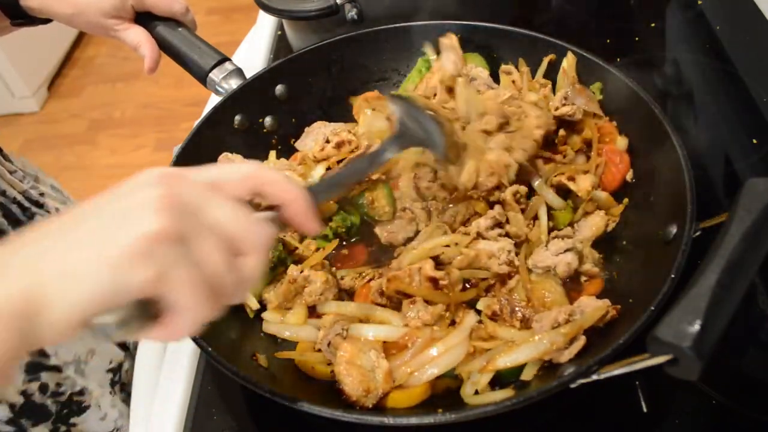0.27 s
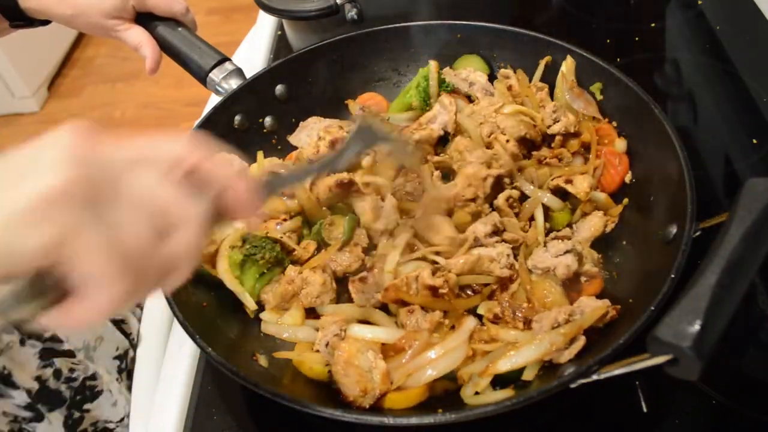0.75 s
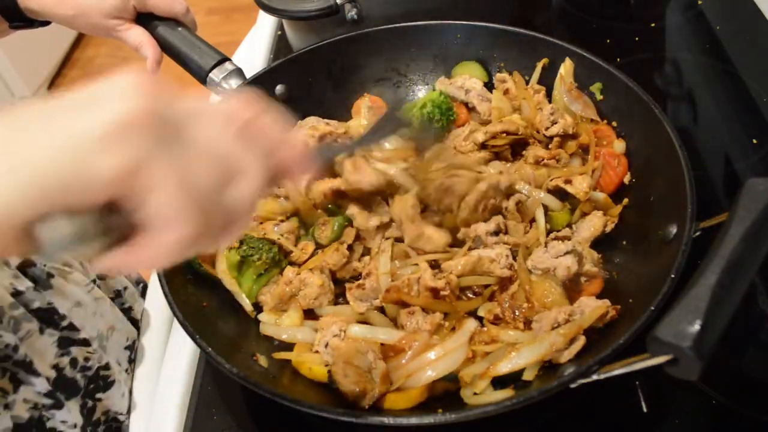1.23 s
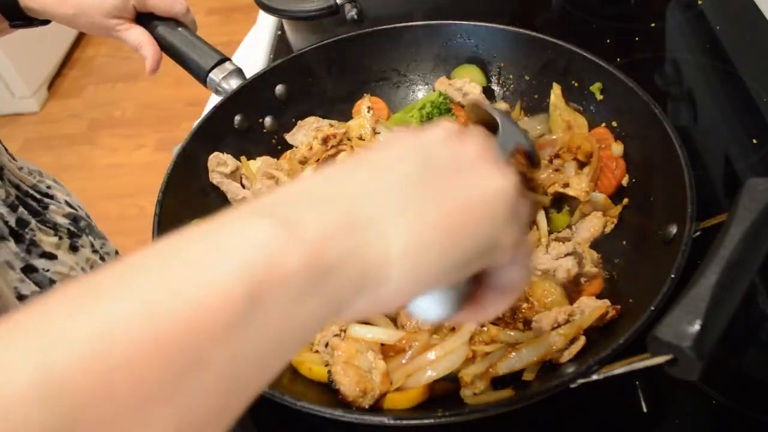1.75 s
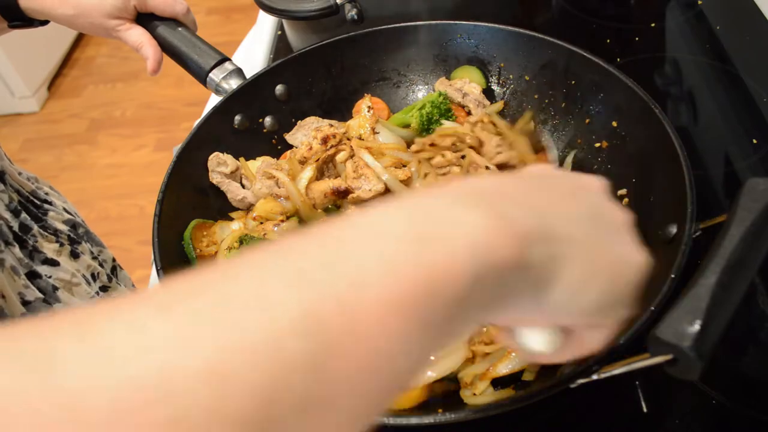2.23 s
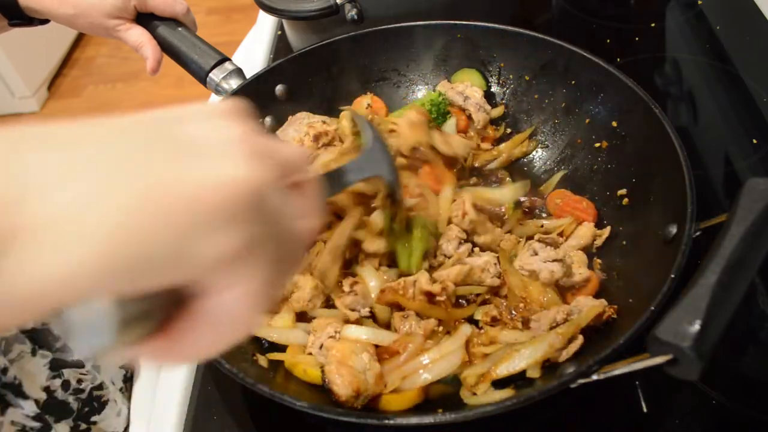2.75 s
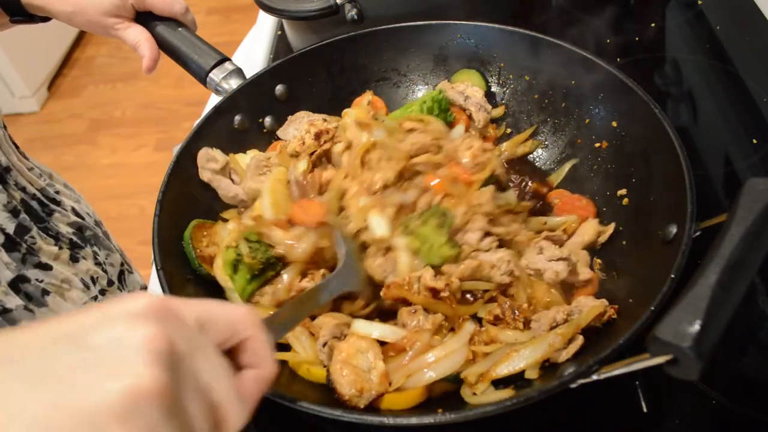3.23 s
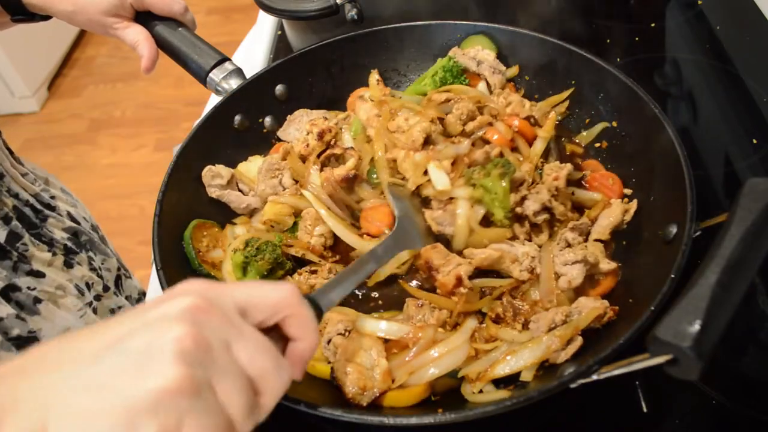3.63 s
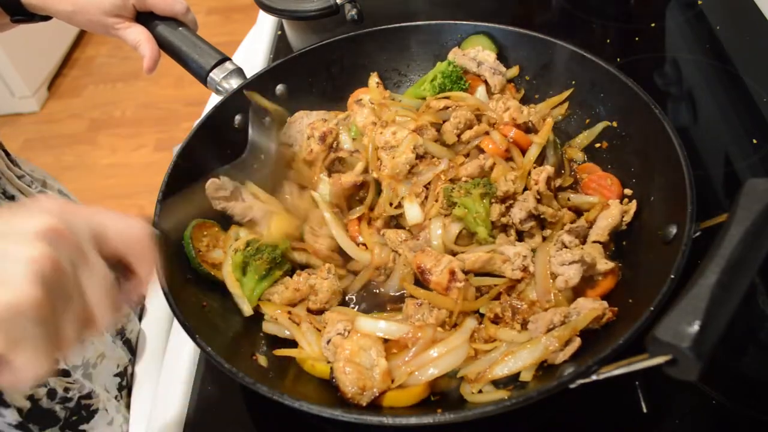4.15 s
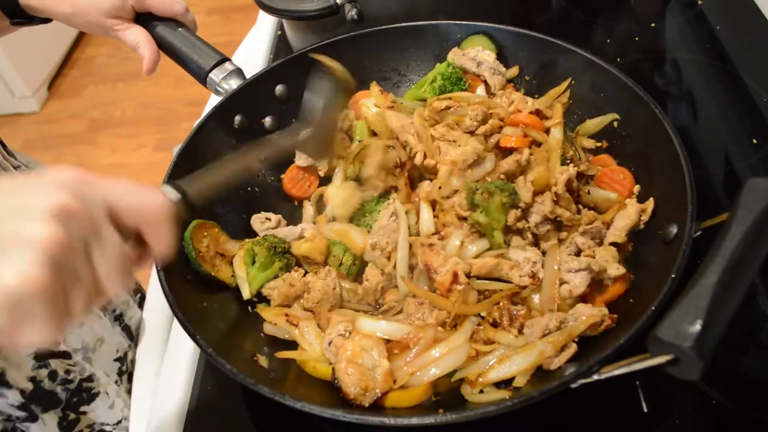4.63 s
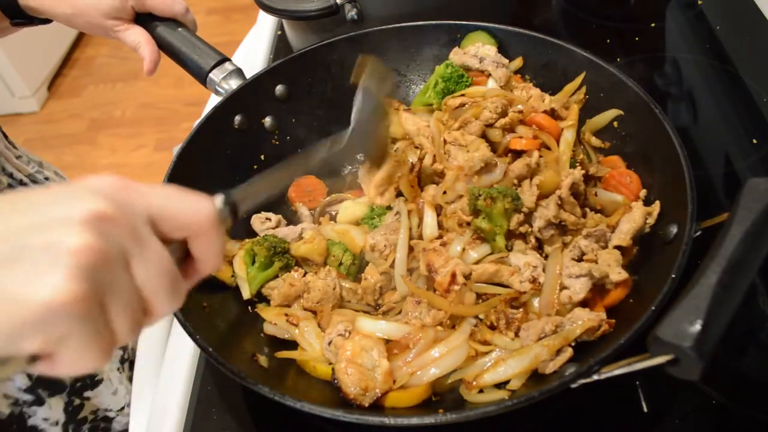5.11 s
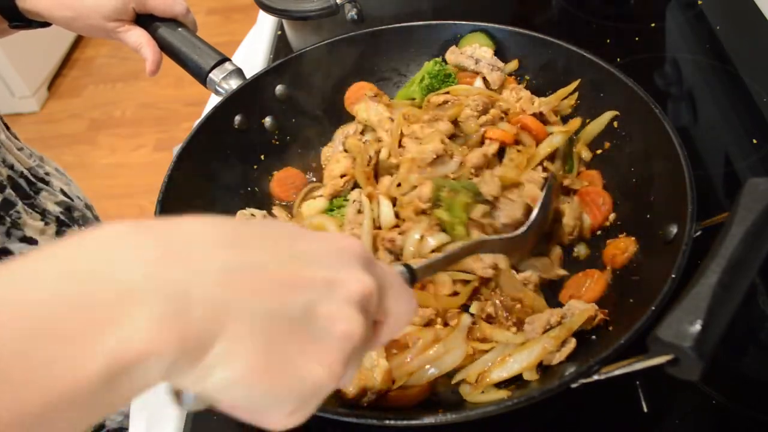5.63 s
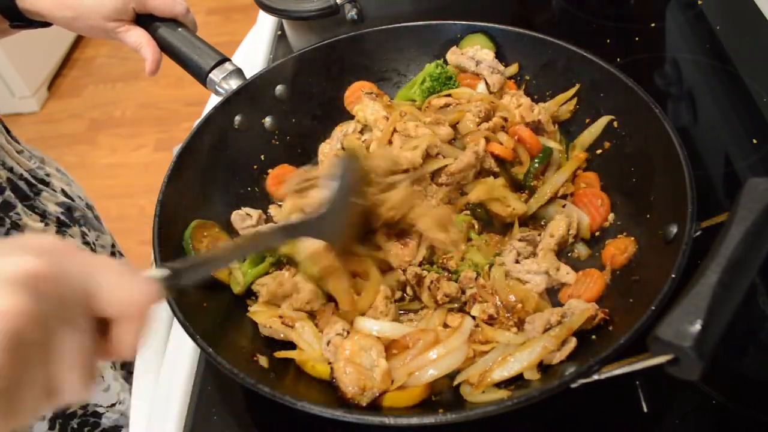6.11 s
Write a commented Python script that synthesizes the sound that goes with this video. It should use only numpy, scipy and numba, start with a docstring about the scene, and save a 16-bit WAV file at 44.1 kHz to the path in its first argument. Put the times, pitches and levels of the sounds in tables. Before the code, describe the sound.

A small, hard kitchen, heard close over an iron wok, with faint low hum, air and hiss underneath. Fine wet sizzling runs throughout. From 0 to 0.9 seconds the spoon pushes food in squelching, rubbing swells, with pops and soft bumps. A sharp wet smack comes at 0.95, then the spoon judders over the pan floor in rows of quick ticks until about 1.7. At 2.0 it lands hard on the wall and scrapes down for a quarter second, loud, bright and raspy, ringing the iron. Brisk stirring follows, with clustered pops from 2.5 to 3.1. At 4.07 one hard, short clack strikes the rim with a low thud and a thin metallic shiver. Steam spits briefly near 4.75, then the food calms until about 5.3. A bump at 5.37 and another push at 5.5 bring crisp spitting pops and brief hisses to the end, about 6.4.

```python
"""Stir-fry in an iron wok

Wet food sizzles close to the microphone: crowds of tiny band-passed bursts, louder as it is stirred and pushed.
Sauce pops and spits as short swelling rings; a spoon judders over the pan floor in rows of ticks.
The spoon lands on the wall and scrapes down it, its chatter ringing the iron, and later clacks on the rim.
The hob hums under steady air and hiss, and a small hard kitchen adds a brief noise-tail echo."""
import sys
import numpy as np
from scipy import signal
from scipy.fft import rfft, irfft
from scipy.io import wavfile
from numba import njit

SR = 44100
rng = np.random.default_rng(int(sys.argv[2]) if len(sys.argv) > 2 else 0)


def dump_mix(stems):
    """Bounce the given channels to the path in sys.argv[1] as a 16-bit WAV at rate SR."""
    frames = np.atleast_2d(stems).T  # one column per channel
    limited = np.clip(frames, -1, 1)  # hard clip at full scale
    pcm = np.round(limited * 32767).astype(np.int16)
    wavfile.write(sys.argv[1], SR, pcm)


N = 280917
TIME = np.arange(N) / SR  # seconds
GRID = np.fft.rfftfreq(16384, 1 / SR)  # filter design frequencies, Hz


def undb(db):
    """Decibels to gain."""
    return 10 ** (np.asarray(db) / 20)


def unit(x):
    """Scale to rms 1."""
    return x / np.sqrt(np.mean(x ** 2))


def curves(rows):
    """The columns of a table, joined by straight lines in time."""
    s, *columns = np.transpose(rows)
    return [np.interp(TIME, s, column) for column in columns]


def colour(points, hz=GRID):
    """Gain of a (pitch_hz, level_db) spectrum at the given frequencies."""
    point_hz, db = np.transpose(points)
    return undb(np.interp(np.log(hz + 1), np.log(point_hz), db))


def shape(x, gain):
    """Causal minimum-phase filter with the given gains: its peaks ring after the sound, never before."""
    cepstrum = irfft(np.log(gain + 1e-9))
    half = len(cepstrum) // 2
    # fold the cepstrum onto positive time
    cepstrum[1:half] *= 2
    cepstrum[half + 1:] = 0
    impulse = irfft(np.exp(rfft(cepstrum)))[:half]
    return signal.fftconvolve(x, impulse)[:len(x)]


@njit
def bandpass(x, hz, q):
    """State-variable band-pass whose centre may move."""
    y, band, low = np.empty(len(x)), 0., 0.
    for i in range(len(x)):
        g = np.tan(np.pi * min(hz[i] / SR, .45))
        v = (band + g * (x[i] + 1e-18 - low)) / (1 + g * (g + 1 / q))
        band = 2 * v - band
        low = low + 2 * g * v
        y[i] = v / q
    return y


def walk(rate):
    """Random drift with a spread near 1, heading for a new value rate times a second."""
    return 1.28 * np.interp(TIME * rate, np.arange(N), rng.standard_normal(N))


def fade(t, t60):
    """Exponential decay that loses 60 dB in t60 seconds."""
    return np.exp(-np.log(1000) * t / t60)


def swell(s, length):
    """A smooth rise and fall around time s, peak 1."""
    return np.cos(np.pi * np.clip((TIME - s) / length, -.5, .5)) ** 2


def add(out, s, sound):
    """Mix a sound in at time s."""
    i = max(int(s * SR), 0)
    out[i:i + len(sound)] += sound[:max(N - i, 0)]


def splash(hz):
    """An eighth of a second of noise about an octave wide."""
    centre = np.full(SR // 8, float(hz))
    noise = rng.standard_normal(SR // 8)
    return unit(bandpass(bandpass(noise, centre, 1.), centre, 1.))


def blip(hz, cycles, grit):
    """A ring that swells for a few cycles and dies, partly noisy; peak near 1."""
    turns = hz * TIME[:SR // 8]
    envelope = (turns / cycles * np.exp(1 - turns / cycles)) ** 2
    tone = np.sin(2 * np.pi * turns)
    return envelope * (tone + grit * splash(hz)) / (1 + grit)


def smack(hz, cycles, grit, smear_db, t60):
    """A blip together with a longer wet smear around the same pitch."""
    smear = splash(hz) * fade(TIME[:SR // 8], t60)
    return blip(hz, cycles, grit) + undb(smear_db) * smear


def crackle(points, rate, spread_db, q):
    """Countless tiny bubbles in twelve pitch bands; most are faint and a few stand out."""
    out = np.zeros(N)
    for hz in np.geomspace(points[0][0], points[-1][0], num=12):
        size = undb(spread_db * np.minimum(rng.standard_exponential(N), 5))
        bursts = (rng.random(N) < rate / SR) * size * rng.choice([-1, 1], N)
        out += unit(bandpass(bursts, np.full(N, hz), float(q))) * np.sqrt(hz)
    return unit(shape(out, colour(points)))


# Colour of the kitchen air and hiss common to both sides: pitch_hz [Hz], level_db [dB]
AIR_COLOUR = [(20, -8), (45, -1), (85, -2), (105, 1), (128, 5.5), (155, -0.5), (200, 0), (350, 1.5),
              (480, -1.5), (640, -0.5), (850, -7), (1500, -13), (4000, -13.5), (16000, -14)]
# Colour of the air and hiss opposed between the sides: pitch_hz [Hz], level_db [dB]
AIR_SIDE_COLOUR = [(30, -2), (130, 0), (500, -2), (1000, -4), (1900, -11), (2800, -14), (5000, -6.5),
                   (8000, -5), (15500, -5.5)]
AIR_DB, AIR_SIDE_DB = -50.5, -57.5
HUM_HZ, HUM_DB = 60.2, -57  # centre of a slightly wavering hum


def background():
    """Mains hum of the hob, kitchen air and microphone hiss; only a little differs between the sides."""
    phase = 2 * np.pi * HUM_HZ * TIME + 0.11 * walk(6.1)
    hum = np.sqrt(2) * np.sin(phase) * undb(HUM_DB + 1.0 * walk(4.32))
    mid = unit(shape(rng.standard_normal(N), colour(AIR_COLOUR))) * undb(AIR_DB)
    side = unit(shape(rng.standard_normal(N), colour(AIR_SIDE_COLOUR))) * undb(AIR_SIDE_DB)
    return hum + mid + np.outer([1, -1], side)


# How briskly the food is kept moving, resting near the end: time_s [s], stirring_db [dB]
STIRRING_CURVE = [(0, 0), (1.25, 0.5), (1.85, -0.5), (2.45, 1.5), (3.6, -1), (4.1, 0.5), (4.6, -5),
                  (5.24, -11.5), (5.42, -3.5), (6.36, -5)]
# Pushes of the spoon through the food, each swelling and fading, before the layer trims:
# middle_s [s], length_s [s], squelch_db [dB], rub_db on the pan floor [dB], sizzle_db [dB]
SPOON_PUSHES = [(0.053, 0.33, -59, -50, -67), (0.36, 0.25, -69, -50, -53.5), (0.574, 0.48, -53, -47.5, -53),
                (0.95, 0.088, -49, -46, -46), (1.164, 0.43, -56, -46, -58), (1.675, 0.22, -66, -47.5, -66),
                (2.984, 0.31, -49, -66, -71), (3.17, 0.28, -51.5, -53, -55), (3.41, 0.31, -62, -49.5, -54),
                (4.24, 0.22, -65, -48, -52.5), (5.524, 0.13, -49, -45, -50), (5.7, 0.19, -66, -60, -56.5)]
# Sauce runs onto bare iron and flashes to steam, before the sizzle trim: middle_s [s], level_db [dB]
STEAM_FLASHES = [(4.725, -46), (4.803, -45.5), (5.81, -48), (6.215, -55)]
FLASH_S = 0.062  # length of each flash
SQUELCH_DB, RUB_DB, SIZZLE_DB = -53, -53, -55.5  # at 0 dB stirring, before the layer trims
RUB_SLOPE, SIZZLE_SLOPE = 0.98, 0.4  # dB gained per dB of stirring


def handling():
    """Levels in dB of squelch, rub and sizzle: the powers of stirring, pushes and steam flashes add up."""
    stirring, = curves(STIRRING_CURVE)
    steady_db = [
        SQUELCH_DB + stirring,
        RUB_DB + RUB_SLOPE * stirring,
        SIZZLE_DB + SIZZLE_SLOPE * stirring,
    ]
    power = undb(steady_db) ** 2
    for s, length, *db in SPOON_PUSHES:
        power += np.outer(undb(db) ** 2, swell(s, length))
    for s, db in STEAM_FLASHES:
        power[2] += undb(db) ** 2 * swell(s, FLASH_S)
    return 10 * np.log10(power)


# Colours of the four frying layers, each: pitch_hz [Hz], level_db [dB]
SIMMER_COLOUR = [(600, -11.5), (1000, -6.5), (1800, -0.5), (2300, -5), (2900, 2), (4000, -2), (5500, -5),
                 (7000, -8), (10000, -11.5), (15000, -12)]
SQUELCH_COLOUR = [(250, -16.5), (500, -3.5), (750, -2), (1050, 0), (1700, -0.5), (2300, -1.5), (3500, -7.5),
                  (6000, -22)]
RUB_COLOUR = [(1800, -19), (2400, -15), (2800, 1), (3200, -4), (3700, -6.5), (5000, -31)]  # spoon rubbing the pan floor
SIZZLE_COLOUR = [(1200, -20), (2300, -2.5), (3500, -4.5), (4500, 1), (5800, -1.5), (6900, 1), (8300, -3.5),
                 (10000, -15), (15000, -42)]


def frying():
    """Sauce simmers all the time; stirring squelches, the spoon rubs, and sauce pushed onto hot iron spits."""
    stir_db, rub_db, sizzle_db = handling()
    spurts = walk(110)  # shared flutter: bubbles burst in little clusters
    squelch_db = stir_db + 2 + 2.36 * walk(70) + 0.69 * spurts
    simmer = crackle(SIMMER_COLOUR, rate=900, spread_db=4, q=0.84) * undb(-53.5)
    squelch = crackle(SQUELCH_COLOUR, rate=350, spread_db=4.0, q=1.33) * undb(squelch_db)
    rub = crackle(RUB_COLOUR, rate=300, spread_db=5.5, q=2.6) * undb(rub_db - 2.5 + 2.8 * spurts)
    sizzle = crackle(SIZZLE_COLOUR, rate=350, spread_db=4.0, q=1.1) * undb(sizzle_db + 1.5 + 2.3 * spurts)
    return simmer + squelch + rub + sizzle


SMALL_POPS_PER_S, SMALL_POP_DB = 8, -33  # typical level, before the pop trim
SMALL_POP_LOW_HZ, SMALL_POP_HIGH_HZ = 1700, 6700


def small_pops():
    """Rows (time_s, level_db, ring_hz) of chance bubbles, fainter while the food rests."""
    stirring, = curves(STIRRING_CURVE)
    when, size, pitch = rng.random((int(SMALL_POPS_PER_S * N / SR), 3)).T
    stir_db = SIZZLE_SLOPE * stirring[(when * N).astype(int)]
    db = SMALL_POP_DB + 6 * (size - .5) + stir_db
    hz = SMALL_POP_LOW_HZ * (SMALL_POP_HIGH_HZ / SMALL_POP_LOW_HZ) ** pitch
    return list(zip(when * N / SR, db, hz))


# The loudest sauce bubbles and wet smacks: start_s [s], level_db before the trim [dB], ring_hz [Hz]
LOUD_POPS = [(0.0288, -25, 2700), (0.086, -26.5, 1250), (0.086, -26, 2730), (0.14, -24.5, 2830),
             (0.171, -28, 2930), (0.9515, -18, 2500), (0.9555, -24, 2980), (0.965, -22, 3100),
             (2.477, -26, 3670), (2.629, -27, 1230), (2.638, -25, 4500), (2.7855, -27, 1430),
             (2.849, -26, 2590), (2.9175, -28, 1300), (2.946, -24.5, 4400), (2.963, -28, 1410),
             (3.057, -28, 5200), (3.729, -28.5, 1590), (4.4752, -28, 6650), (5.3692, -26, 5900),
             (5.645, -24.5, 4800), (5.8207, -25, 5900), (5.844, -28, 4760), (5.886, -28.5, 3300),
             (5.928, -26, 5000), (5.987, -26, 5030), (6.0566, -27.5, 3630), (6.2097, -26, 3950)]
# Soft bumps of spoon and falling food on the pan: start_s [s], level_db [dB], ring_hz [Hz]
SOFT_BUMPS = [(0.12, -37.5, 485), (0.17, -36, 504), (0.302, -34.5, 630), (1.508, -37, 587),
              (4.35, -35.5, 614), (4.772, -38, 603), (5.003, -35.5, 585), (5.3653, -27, 640)]
# Hard contacts that also rock the wok on the hob: start_s [s]
THUD_TIMES = [1.990, 4.072, 5.369]
POP_TRIM_DB = -1.5
THUD_DB, THUD_HZ = -39.5, 126


def pops():
    """Single larger bubbles and smacks ring briefly; bumps cushioned by food and thuds are duller."""
    out = np.zeros(N)
    for s, db, hz in list(LOUD_POPS) + small_pops():
        pop = smack(hz, cycles=1.88, grit=0.58, smear_db=-14.5, t60=0.039)
        add(out, s, undb(db + POP_TRIM_DB) * pop)
    thuds = [(s, THUD_DB, THUD_HZ) for s in THUD_TIMES]
    for s, db, hz in list(SOFT_BUMPS) + thuds:
        bump = smack(hz, cycles=0.9, grit=0.35, smear_db=-9, t60=0.069)
        add(out, s, undb(db) * bump)
    return out


# Drags in which the spoon sticks and slips on the pan floor:
# start_s [s], end_s [s], slip_rate [slips per second], first_level_db before the trim [dB], ring_hz [Hz]
SPOON_DRAGS = [(1.0235, 1.058, 68, -31, 3100), (1.0642, 1.108, 102, -21.5, 3130),
               (1.1548, 1.375, 56.2, -26, 2800), (1.3905, 1.725, 48.6, -28.5, 2790)]
SLIP_TRIM_DB, SLIP_SCATTER_DB = -1, 1.4  # trim on all slips, and their unevenness
DRAG_EASE_DB_PER_S = 12


def judder():
    """The dragged spoon sticks and lets go; each slip is one short tick, weaker as the drag eases."""
    out = np.zeros(N)
    for start, end, rate, db, hz in SPOON_DRAGS:
        for s in np.arange(start, end, 1 / rate):
            eased_db = db + SLIP_TRIM_DB - DRAG_EASE_DB_PER_S * (s - start)
            slip_db = eased_db + SLIP_SCATTER_DB * rng.standard_normal()
            add(out, s, undb(slip_db) * blip(hz, cycles=1.44, grit=0.18))
    return out


# The spoon lands, speeds up down the bare wall, slows and lifts: # time_s [s], force_db before the trim [dB],
# catch_hz, centre pitch of the edge's chatter [Hz]
SCRAPE_PATH = [(1.9875, -15, 3200), (2.001, -26, 2600), (2.03, -17.5, 2560), (2.05, -13.5, 4150),
               (2.09, -16.5, 4450), (2.13, -15.5, 3940), (2.157, -15, 2600), (2.178, -23.5, 1850),
               (2.21, -30, 1500), (2.227, -23.5, 2000), (2.255, -64, 1900)]
# The wok's ringing modes: pitch_hz [Hz], width_hz [Hz], level_db [dB]
WOK_MODES = [(500, 18, -3), (566, 23, 0), (858, 29, 2), (1260, 25, 2), (1410, 39, -2), (1575, 33, 2),
             (2230, 18, 1), (2440, 35, 0), (2540, 31, 3), (2710, 20, -4), (2820, 31, -3.5), (3430, 26, -25),
             (3790, 18, 4), (3860, 16, -2), (3930, 30, 3.5), (4220, 26, 3.5), (4200, 28, -4), (4360, 36, 6),
             (4500, 52, 4), (4695, 18, -11), (4962, 31, 0), (4870, 22, 2.5), (5160, 15, -4), (5950, 38, 1),
             (6100, 36, 3), (6320, 40, -8), (6580, 36, 5), (6800, 35, 4), (7530, 19, -2), (8330, 40, 6)]
# The crowd of weaker modes between them: pitch_hz [Hz], level_db [dB]
WOK_BODY_COLOUR = [(100, -31), (250, -26), (500, -13.5), (1000, -10), (1900, -11.5), (2400, -1),
                   (3200, -13), (4300, 0), (5400, -5.5), (6400, -3.5), (8700, -3), (10000, -8),
                   (13000, -15.5), (16000, -37)]
FORCE_TRIM_DB = -0.8
LANDING_DB = -9.5  # the spoon's first touch, before the iron colours it


def wok_gain():
    """Resonances of the iron: the powers of the sharp modes and of the weaker crowd add up."""
    power = colour(WOK_BODY_COLOUR) ** 2
    for hz, width, db in WOK_MODES:
        power += undb(db) ** 2 / (1 + (2 * (GRID - hz) / width) ** 2)
    return np.sqrt(power)


def scrape():
    """The spoon lands on the wall and slides: its edge chatters faster with speed and rings the wok's modes."""
    force_db, catch_hz = curves(SCRAPE_PATH)
    since = np.maximum(TIME - SCRAPE_PATH[0][0], 0)
    touching = (since > 0) & (TIME < SCRAPE_PATH[-1][0])
    grip = undb(2.0 * np.tanh(2 * walk(220)))  # the edge digs in and skips every few milliseconds
    snags = (rng.random(N) < 6000 / SR) * rng.choice([-1, 1], N)  # on the rough iron
    catches = unit(snags) * grip
    chatter = bandpass(bandpass(catches, catch_hz, 0.98), catch_hz, 0.98) * np.sqrt(SR / catch_hz)
    rasp = catches * catch_hz / 4200  # a slow edge makes little broad rasp
    sliding = (chatter + rasp) * touching * undb(force_db + FORCE_TRIM_DB)
    # the landing is a noise burst that rings the iron and is also heard bare
    attack = np.minimum(since / 0.00035, 1)
    landing = rng.standard_normal(N) * attack * fade(since, t60=0.13) * undb(LANDING_DB)
    bare_landing = undb(-10.0) * bandpass(landing, np.full(N, 4500.), 0.064)
    return shape(sliding + landing, wok_gain()) + bare_landing


# Modes of the struck spoon, damped by the hand: pitch_hz [Hz], t60_s [s], level_db [dB]
SPOON_MODES = [(776, 0.033, -5), (1135, 0.021, 0), (1457, 0.041, 0), (1673, 0.042, 4.5), (2090, .025, 1),
               (2660, 0.017, 5), (2960, 0.029, 3.5), (3450, 0.028, -1), (3920, 0.083, -2.5),
               (4880, 0.026, 3), (5130, 0.022, -13), (5300, .03, -10), (6300, 0.029, -8),
               (8650, 0.031, -12), (11400, .015, -5), (14100, .012, -9)]
# Colour of the crack: pitch_hz [Hz], level_db [dB]
CRACK_COLOUR = [(200, -23), (550, -14), (800, -3), (1600, 1), (3400, 1), (4400, -8.5), (5500, -5.5),
                (7000, -15.5), (9000, -7.5), (10500, -18), (11600, -13), (13000, -17), (16000, -24)]
# Colour of the pan's shiver after the clack: pitch_hz [Hz], level_db [dB]
SHIVER_COLOUR = [(500, -9), (1500, -16), (4300, 7), (5400, -7), (6700, 3), (7500, -12), (9000, -5),
                 (9800, -20), (16000, -24)]
CLACK_S, RING_DB, CRACK_DB, SHIVER_DB = 4.0724, -18, -26.5, -32.5


def clack():
    """One hard blow on the rim: a short noise crack, hand-damped modes, and a diffuse shiver of the pan."""
    t = TIME[:SR // 4]
    ring = np.zeros(len(t))
    for k, (hz, t60, db) in enumerate(SPOON_MODES):
        polarity = (-1) ** k
        ring += polarity * undb(db) * fade(t, t60) * np.sin(2 * np.pi * hz * t)
    contact = t / 0.00053 * np.exp(1 - t / 0.00065)  # lasts about a millisecond
    crack_envelope = contact + undb(-7) * fade(t, t60=0.027)
    crack = shape(rng.standard_normal(len(t)) * crack_envelope, colour(CRACK_COLOUR))
    shiver = unit(shape(rng.standard_normal(len(t)), colour(SHIVER_COLOUR))) * fade(t, t60=0.39)
    out = np.zeros(N)
    add(out, CLACK_S, undb(RING_DB) * ring + undb(CRACK_DB) * unit(crack) + undb(SHIVER_DB) * shiver)
    return out


# Colour of the kitchen's echo: pitch_hz [Hz], level_db [dB]
KITCHEN_COLOUR = [(100, 12), (500, 9.5), (1500, -5), (2800, 0), (4200, -2.5), (7000, 4), (10000, 1),
                  (16000, -10)]


def kitchen(x, wet_db, t60, gap_s):
    """A small hard room: echoes arrive after a short gap and fade as a decaying tail of noise."""
    t = TIME[:SR]
    onset = np.clip(t / gap_s - 1, 0, 1)
    tail = shape(rng.standard_normal(SR) * fade(t, t60) * onset, colour(KITCHEN_COLOUR))
    tail = tail / np.sqrt(np.sum(tail ** 2))  # unit energy
    return x + undb(wet_db) * signal.fftconvolve(x, tail)[:N]


def scene():
    """The wok is straight ahead, so it sounds alike on both sides."""
    pan = frying() + pops() + judder() + scrape() + clack()
    return kitchen(pan, wet_db=-14.5, t60=0.49, gap_s=0.0021) + background()


TOP_HZ = 15900


def record(dry):
    """The recorder clips anything beyond full scale, then a steep low-pass cuts the top."""
    low_pass = signal.ellip(10, .1, 70, TOP_HZ, fs=SR, output="sos")
    return signal.sosfilt(low_pass, np.clip(dry, -1, 1))


dry = scene()
out = record(dry)
dump_mix(out)
```